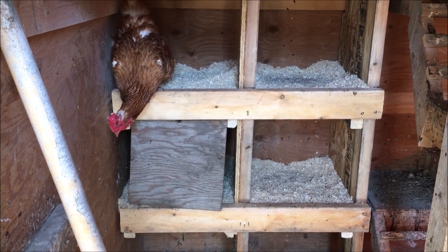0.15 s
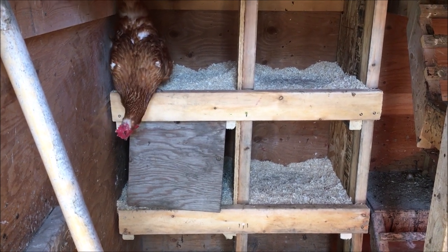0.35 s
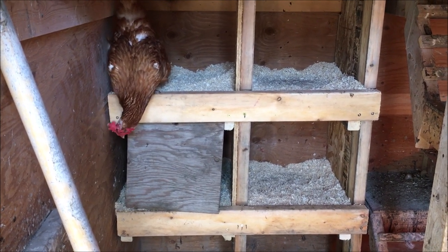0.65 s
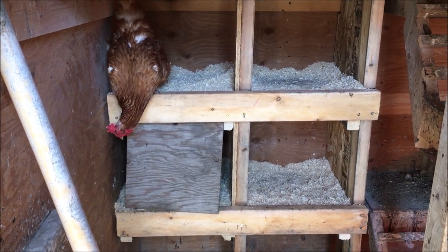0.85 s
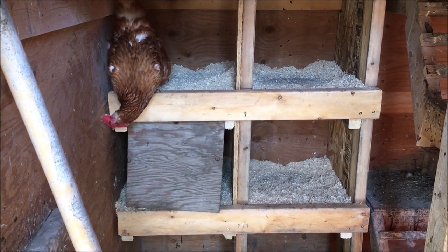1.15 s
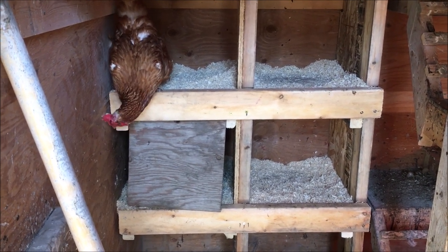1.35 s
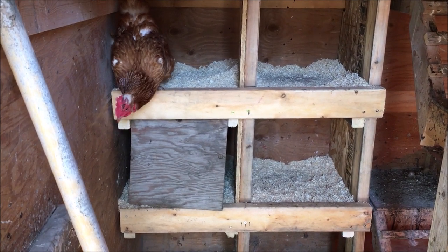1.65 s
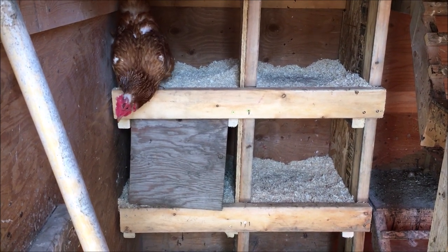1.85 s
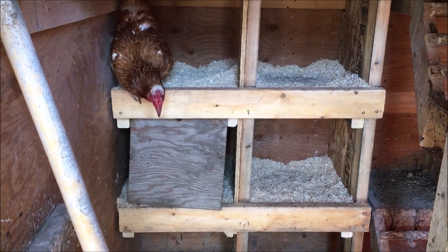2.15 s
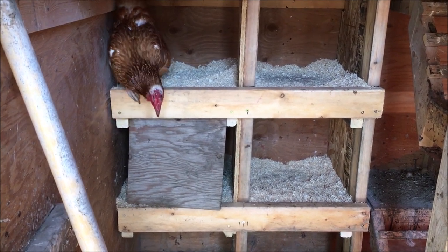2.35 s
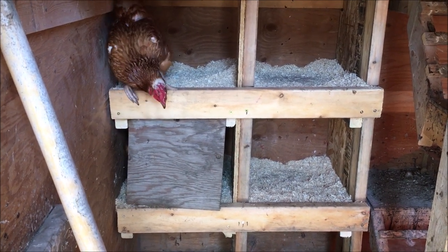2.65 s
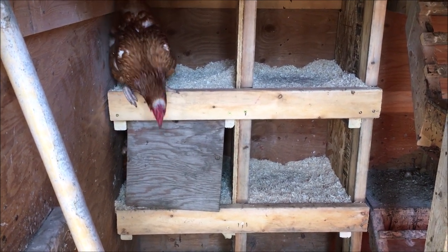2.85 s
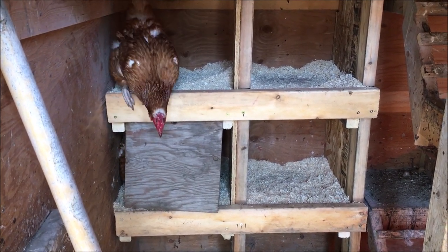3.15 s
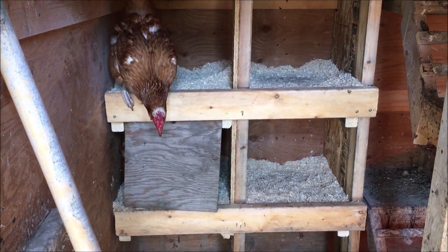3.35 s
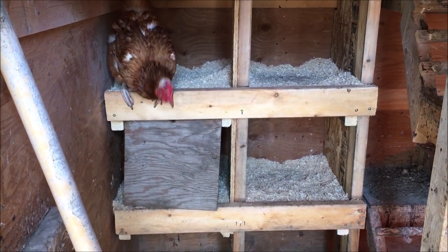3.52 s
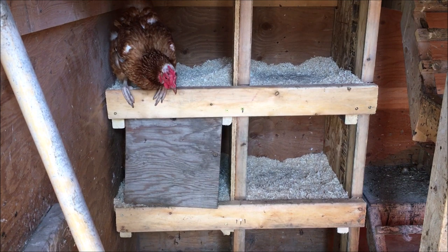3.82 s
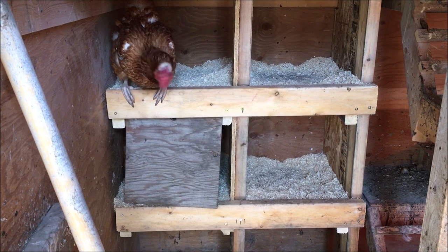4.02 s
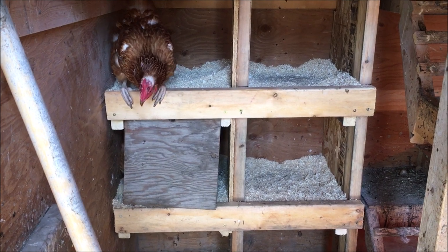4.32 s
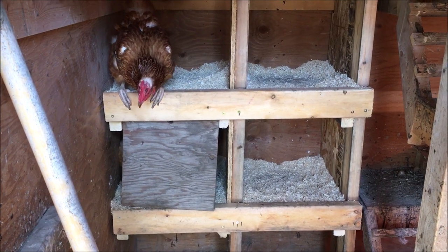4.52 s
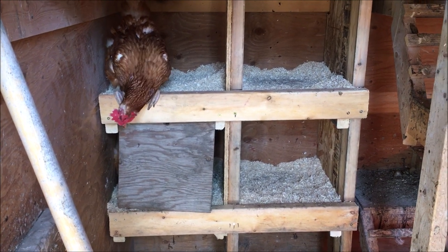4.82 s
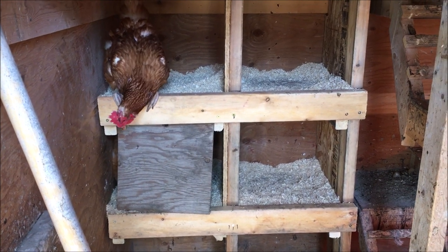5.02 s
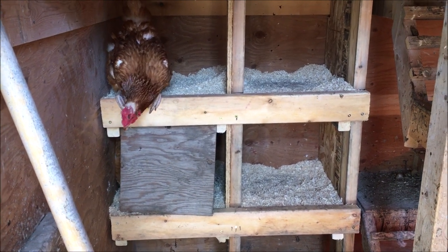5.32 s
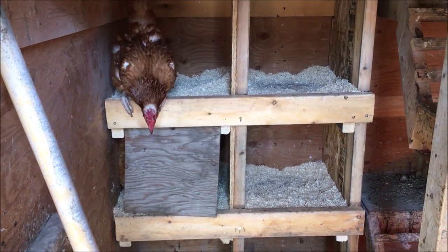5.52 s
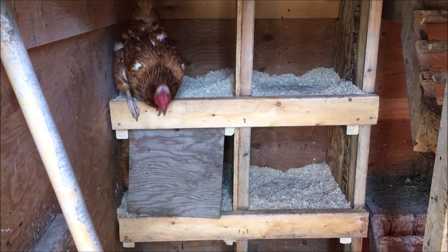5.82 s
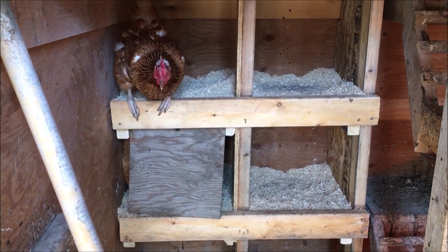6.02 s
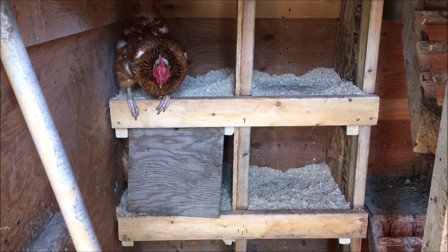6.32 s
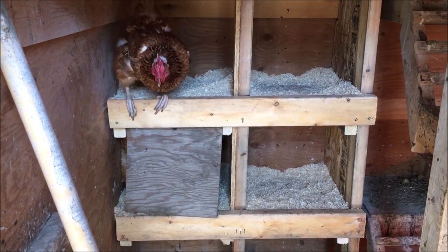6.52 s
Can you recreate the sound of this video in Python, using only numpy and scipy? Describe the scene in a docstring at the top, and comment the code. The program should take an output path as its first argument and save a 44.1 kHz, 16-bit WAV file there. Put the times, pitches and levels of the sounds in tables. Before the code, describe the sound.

Dull wooden bumps and faint scratchy shuffling inside a small plank coop, ending with a close hen's whistling, rasping squawks.

```python
"""Inside a small wooden coop: a quiet yard, and a faint murmur of other hens and lingering coop sound.
Close by, feet and wings scuff and knock on boards and shavings: grainy noise, with booming modes.
Then a hen whistles up into three hoarse squawks, sung by two membranes through a throat and a nest box.
The plank walls ring briefly around bird and contacts; the microphone thins the deepest bass."""
import sys
import numpy as np
from scipy import signal
from scipy.fft import rfft, irfft, next_fast_len
from scipy.io import wavfile
from scipy.ndimage import uniform_filter1d

SR = 44100
rng = np.random.default_rng(int(sys.argv[2]) if len(sys.argv) > 2 else 0)


def pcm_store(signal):
    """Save signal as 16-bit PCM."""
    levels = np.round(np.clip(np.atleast_2d(signal), -1, 1) * 32767)
    wavfile.write(sys.argv[1], SR, levels.astype(np.int16).T)


N = 294147  # samples
T = np.arange(N) / SR  # s

# All levels are relative, ahead of the final mix.
# Air and hiss of the yard: pitch_hz, density_db (per Hz)
YARD_SPECTRUM = [(18, -35.5), (30, -3), (85, 2.5), (102, -10), (467, -13), (1140, -29.5), (1400, -29.5),
                 (1550, -42.5), (1680, -16.5), (2300, -26), (6720, -27.5), (15500, -32.5)]
# Faint murmur of other hens and lingering coop sound, swelling and fading: time_s, level_db
MURMUR_LEVEL = [(0.0, -69.5), (1.2, -69.5), (1.35, -74), (1.78, -55.5), (1.92, -65), (2.34, -62.5),
                (2.55, -72.5), (2.83, -63.5), (3.6, -71), (3.94, -72.5), (4.28, -62.5), (4.8, -67)]
# Spectrum of that murmur: pitch_hz, level_db
MURMUR_SPECTRUM = [(200, 8), (400, -2), (700, 4.5), (1100, -1), (1370, 4.5), (1700, -7), (3000, -9),
                   (6000, -32)]
# Claws and feathers scuffing: start_s, swell_s, fade_s, level_db, then hiss_db, boards_db, frame_db over it
SCUFF_EVENTS = [(0.189, 0.048, 0.028, -50, -13.5, -3, 6), (.26, 0.027, 0.12, -54.5, -16.5, 3.5, -4),
                (0.669, 0.067, 0.23, -48, -7.5, -7, -3), (0.759, 0.041, 0.092, -48, 3.5, 7, -12),
                (0.849, 0.027, 0.049, -43, -26, 6.5, -4), (1.599, 0.049, .25, -52.5, -4, 14.5, 9.5),
                (1.7, 0.078, 0.078, -45, -6.5, 0, -14), (2.048, 0.037, 0.074, -54, -18, -7, -9),
                (2.15, 0.058, 0.081, -67.5, -17, 5.5, 2), (2.65, 0.042, 0.091, -65, 1, 9.5, 0.5),
                (2.733, 0.051, 0.031, -41, -1, -8, 5.5), (2.768, 0.017, 0.053, -58.5, 10, -1, 4),
                (3.2, 0.098, 0.068, -55, 0, 4.5, 8), (3.3, 0.068, 0.2, -69, 1.5, 7.5, 24.5),
                (4.332, .115, 0.072, -49.5, -7.5, -32, 6), (4.63, 0.038, 0.038, -58, -16.5, -13.5, -3.5)]
# Knocks on the wood: start_s, level_db, then click_db, hiss_db, boards_db, frame_db over it, rise_s
KNOCK_EVENTS = [(0.215, -53.5, -13, -4, 12.5, 11.5, 0.005), (0.74, -43, -34, -25, -15, -17, 0.0056),
                (.815, -60, -12, -8, 1, -21, 0.0018), (.853, -32.5, 0, 3.5, 1.5, -21, 0.0044),
                (1.062, -23.5, -13, -14, -9.5, -29, 0.012), (1.208, -39.5, -34, -20, -7, -24, .0014),
                (1.371, -20, -23, -18.5, -9.5, -24, 0.005), (1.623, -35.5, -42, -7.5, 5.5, -28, 0.0025),
                (1.723, -43, -37, 9, 5, 4, 0.00083), (1.768, -27, -31, 4, -12, -4, 0.0062),
                (1.802, -31, -1, -1, -8.5, -13, 0.0013), (2.384, -27, -16.5, -52, -14.5, -15, 0.0029),
                (2.739, -44.5, 6, -1, -19, -15, 0.0033), (2.804, -31, -6, 15, 1.5, -4.5, 0.00041),
                (3.429, -32, -10.5, -15, -4, -11, 0.0043), (3.674, -54.5, -18, -12.5, -10, -15.5, 0.0015),
                (3.909, -57, -34.5, -31, 3.5, -15, .002), (4.436, -37, 4, -7.5, -27, -25, 0.00096),
                (4.668, -42, -1.5, -30, -31, -17, 0.00052), (4.851, -37.5, -18, -20.5, 2, -10, 0.001),
                (5.771, -44, -14, -25, -2.2, 3, 0.0036), (5.867, -32.5, -14.5, -27, -14, -13, 0.00096),
                (6.145, -37, -24, -24, 2.2, -4.5, .002), (6.553, -36, -9.5, -33, -13.5, -26, 0.0026)]
# Spectrum of the wooden contact noise: pitch_hz, level_db
WOOD_SPECTRUM = [(150, -2), (300, 1.5), (620, 2), (850, 4.5), (1260, 2), (1800, -3), (2600, -36.5)]
# Spectrum of the contact hiss: pitch_hz, level_db
HISS_SPECTRUM = [(1200, -8), (2000, -4), (3200, 2), (4500, -3.5), (6500, -9), (9500, -19), (12000, -29),
                 (16000, -38)]
# Spectrum of the contact click and crack: pitch_hz, level_db
CLICK_SPECTRUM = [(1300, -23), (2000, 11.5), (3800, 4), (6000, -39), (16000, -45)]
# Ringing modes of the boards: pitch_hz, level_db, t60_s
BOARD_MODES = [(129.2, -12, 0.47), (211.8, 2.5, 0.25), (279.7, -6, 0.14), (360, -10.5, 0.17),
               (378, -2, 0.19), (617, -5.5, 0.22), (857, -20.5, 0.18), (1258, -16, 0.12)]
# Ringing modes of the coop's deeper frame: pitch_hz, level_db, t60_s
FRAME_MODES = [(50.6, -5.5, 1), (58.8, -2.5, 0.8), (73.9, -1.5, 0.83), (81.65, -5.5, 0.84),
               (99.2, -3.5, 0.37)]
# The hen's calls, one curve a call: time_s, level_db, treble_db
SQUAWK_CURVES = [
    [(4.8, -40, -23), (4.845, -44, -28), (4.925, -37, -51), (4.958, -49.5, -15), (4.98, -36, -35),
     (5.03, -44.5, -10), (5.06, -37.5, -25.5), (5.23, -31.5, -24.5), (5.255, -35.5, -11), (5.29, -32, -14),
     (5.46, -28, -16.5), (5.53, -33, -6.5), (5.62, -29.5, -9.5), (5.68, -26.5, -11), (5.732, -32, -3),
     (5.79, -51, -10)],
    [(5.908, -33, -5), (6.0, -33, -2.5), (6.02, -25, -17), (6.095, -32.5, 0.5), (6.13, -24.5, 1),
     (6.19, -28, -3.5), (6.221, -24.5, -7.5), (6.25, -34.5, 11), (6.272, -17, -8), (6.285, -28.5, 9),
     (6.34, -28.5, 6), (6.39, -30, 3.5), (6.431, -24.5, -20), (6.455, -42, -11)],
    [(6.606, -42, -5.5), (6.641, -30.5, -0.5), (6.67, -31, 8)],
]
# The voice glides in one register, then breaks into the next: start_s, from_hz, to_hz, register (name)
VOICE_BREAKS = [(4.802, 1112, 1076, "cluck"), (4.849, 925.5, 970, "whistle"), (4.961, 956, 1101, "whistle"),
                (5.064, 1082, 1031, "breathy"), (5.149, 1021, 1054, "breathy"),
                (5.225, 1059, 1403, "breathy"), (5.285, 1347, 1340, "hoarse"),
                (5.33, 1160, 1177, "beating"), (5.35, 1405, 1297, "beating"),
                (5.378, 1188, 1191, "beating"), (5.395, 1340, 1340, "hoarse"),
                (5.447, 1497, 1487, "beating"), (5.485, 1339, 1343, "hoarse"), (5.58, 1391, 1328, "rasp"),
                (5.65, 1324, 1362, "rasp"), (5.9, 1322, 1340, "hoarse"), (6.005, 1345, 1334, "reedy"),
                (6.072, 1338, 1361, "clear"), (6.162, 1283, 1375, "breathy"), (6.2, 1365, 1334, "breathy"),
                (6.25, 1274, 1301, "breathy"), (6.283, 1395, 1413, "halved"), (6.328, 1481, 1502, "buzz"),
                (6.397, 1345, 1372, "breathy"), (6.599, 1348, 1340, "rasp"), (6.635, 1340, 1317, "halved")]
# Ways the membrane can swing, by name: half_pitch_db, its_overtones_db, roughness (0-1), second_membrane_db
MEMBRANE_REGISTERS = {"whistle": (-32, -49, 0.24, -49), "clear": (-45, -44, .04, -47),
                      "breathy": (-26, -22, 0.38, -29), "halved": (13.5, -5, 0.14, -7),
                      "hoarse": (2.5, 1, 0.59, -14), "beating": (-20, -7.5, 0.48, -14.5),
                      "rasp": (-16, -0.5, 0.88, -5), "reedy": (-20.5, 2, 0.38, -26),
                      "cluck": (15.5, -16, 0.26, -43), "buzz": (6.5, 5, 0.37, -9.5)}
# Response of throat and beak: pitch_hz, level_db
THROAT_RESPONSE = [(400, -18), (600, -12.5), (1000, 1), (1400, 3), (2000, -7), (2700, -7.5), (3800, -7.5),
                   (4700, -19), (5200, -31.5), (6600, -21.5), (8000, -32.5), (9500, -28), (12000, -49),
                   (16000, -43)]
# Air modes of the nest box around the hen: pitch_hz, level_db, t60_s
NEST_MODES = [(646, -28, 0.051), (780, -3.5, 0.34), (836.4, 5, 0.089), (1030, 5, 0.07), (1185, 0.5, 0.1),
              (1340, -14, 0.061), (1483, -10, 0.42), (1624, 5, 0.15), (1910, -3, 0.29), (2067, 6, 0.033),
              (2340, 5, 0.11), (2655, 9.5, 0.038), (3260, -2, 0.044), (3330, -2.5, 0.044),
              (3730, -10.5, 0.1), (4020, 4, 0.025)]
# Decay of the coop's tail: pitch_hz, t60_s
ROOM_DECAY = [(125, 0.46), (400, 0.23), (1100, 0.21), (2900, 0.18), (7700, 0.1), (14000, 0.16)]

YARD_DB = -67.5
SCUFF_RANGE_DB, SCUFF_CATCH_DB = 26.5, 2.5  # depth of swell and fade; unevenness of the drag
KNOCK_S, KNOCK_PER_RISE = 0.021, 4.44  # t60 of a knock: base, and seconds added per second of rise
CRACK_DB = 14
BREAK_S, SECOND_HZ, THROB_DB = 0.0081, 834.5, 1.3  # register break; centre of second membrane; throb spread
MIC_HZ, TOP_HZ = 48, 15820  # low edge of the microphone, top edge of the recorder


def amp(db):
    """dB to gain."""
    return 10 ** (np.asarray(db) / 20)


def unit(x):
    """Scale to rms 1."""
    return x / np.sqrt(np.mean(x ** 2))


def even(x, seconds):
    """Hold a noise at rms 1 over short stretches."""
    return x / np.sqrt(uniform_filter1d(x ** 2, int(seconds * SR)))


def shape(table, hz):
    """Read a (Hz, value) table on a log-frequency axis."""
    table_hz, values = np.transpose(table)
    return np.interp(np.log(np.maximum(hz, 1)), np.log(table_hz), values)


def colour(x, table):
    """Filter by a (Hz, dB) spectrum."""
    size = next_fast_len(len(x))
    gain = amp(shape(table, np.fft.rfftfreq(size, 1 / SR)))
    return irfft(rfft(x, size) * gain, size)[:len(x)]


def walk(rate):
    """Smooth random wander, about rate changes a second, spread 1."""
    width = max(int(SR / rate), 1)
    once = uniform_filter1d(rng.standard_normal(N), width)
    return unit(uniform_filter1d(once, width))


def ring(x, modes):
    """Let a push or sound excite decaying sine modes (Hz, dB, t60 s)."""
    age = T[:SR]
    body = 0
    for hz, db, t60 in modes:
        body = body + amp(db) * np.sin(2 * np.pi * hz * age) * np.exp(-age * np.log(1000) / t60)
    return signal.fftconvolve(x, body / np.sqrt(np.sum(body ** 2)))[:N]


def yard():
    """Quiet air and hiss as coloured noise; a second noise swells and fades as murmur and lingering sound."""
    time, level_db = np.transpose(MURMUR_LEVEL)
    flicker_db = 1.5 * walk(14)
    murmur_noise = unit(colour(rng.standard_normal(N), MURMUR_SPECTRUM))
    murmur = amp(np.interp(T, time, level_db) + flicker_db) * murmur_noise
    air_gain = amp(YARD_DB + 0.4 * walk(12))
    return air_gain * unit(colour(rng.standard_normal(N), YARD_SPECTRUM)) + murmur


def contact_noises():
    """One grainy noise heard three ways: wood, hiss and click."""
    grains = rng.standard_normal(N) * amp(6.3 * walk(310))
    wood = even(colour(grains, WOOD_SPECTRUM), 0.039)
    hiss = even(colour(grains, HISS_SPECTRUM), 0.028)
    click = even(colour(grains, CLICK_SPECTRUM), 0.019)
    return wood, hiss, click


def scuffs(wood_noise, hiss_noise):
    """Dragging contact: noise that swells and fades unevenly, and random pushes on boards and frame."""
    wood, hiss, tap, push = np.zeros((4, N))
    catch = amp(SCUFF_CATCH_DB * walk(45.05))
    for start, swell, fade, db, hiss_db, board_db, frame_db in SCUFF_EVENTS:
        now = slice(int(start * SR), int((start + swell + fade) * SR))
        rising = (T[now] - start) / swell
        falling = 1 + (start + swell - T[now]) / fade
        ramp = np.minimum(rising, falling)
        drag = amp(db - SCUFF_RANGE_DB * (1 - ramp)) * catch[now]
        for layer, share_db in ((wood, 0), (hiss, hiss_db), (tap, board_db), (push, frame_db)):
            layer[now] += amp(share_db) * drag
    tap *= rng.standard_normal(N)
    push *= rng.standard_normal(N)
    return wood * wood_noise + hiss * hiss_noise, tap, push


def knocks(wood_noise, hiss_noise, click_noise):
    """Blows: short noise that lasts longer after a slow rise, a crack, and pushes on boards and frame."""
    wood, hiss, click, crack, tap, push = np.zeros((6, N))
    for start, db, click_db, hiss_db, board_db, frame_db, rise in KNOCK_EVENTS:
        first = int(start * SR)
        now = slice(first, first + SR // 5)
        age = np.maximum(T[now] - start, 0)
        t60 = KNOCK_S + KNOCK_PER_RISE * rise
        blow = amp(db) * (1 - np.exp(-age / rise)) * np.exp(-age * np.log(1000) / t60)
        for layer, share_db in ((wood, 0), (click, click_db), (hiss, hiss_db)):
            layer[now] += amp(share_db) * blow
        # a slower contact cracks less
        crack[first] = amp(db + click_db + CRACK_DB) * min(0.0015 / rise, 1)
        # one smooth push on the boards; the weight of the bird lands slower on the frame
        tap[now] += amp(db + board_db) * age / 0.00041 * np.exp(-age / 0.00037)
        push[now] += amp(db + frame_db) * age / 0.0027 * np.exp(-age / 0.0013)
    near = wood * wood_noise + hiss * hiss_noise + click * click_noise
    return near + colour(crack, CLICK_SPECTRUM), tap, push


def contacts():
    """Scuffs and knocks close by, and the boom their pushes set off in boards and frame."""
    wood, hiss, click = contact_noises()
    scuff, scuff_tap, scuff_push = scuffs(wood, hiss)
    knock, knock_tap, knock_push = knocks(wood, hiss, click)
    boom = ring(scuff_tap + knock_tap, BOARD_MODES) + ring(scuff_push + knock_push, FRAME_MODES)
    return scuff + knock, boom


def squawk_curves(fade):
    """Breath over time: a gain that fades in and out of each call, and the treble in dB."""
    gate = 0
    for call in SQUAWK_CURVES:
        since_start, until_end = T - call[0][0], call[-1][0] + fade - T
        gate = gate + np.clip(np.minimum(since_start, until_end) / fade, 0, 1)
    time, level_db, treble_db = np.concatenate(SQUAWK_CURVES).T
    return gate * amp(np.interp(T, time, level_db)), np.interp(T, time, treble_db)


def membrane_state():
    """Pitch and register of the swinging membrane, each break smoothed over a few milliseconds."""
    start, from_hz, to_hz = np.transpose([row[:3] for row in VOICE_BREAKS])
    end = np.append(start[1:], N / SR)
    row = np.clip(np.searchsorted(start, T) - 1, 0, None)
    progress = np.clip((T - start[row]) / (end - start)[row], 0, 1)
    glide = from_hz[row] + (to_hz - from_hz)[row] * progress
    registers = np.array([MEMBRANE_REGISTERS[r[3]] for r in VOICE_BREAKS], float)[row].T
    return uniform_filter1d(np.vstack([glide, registers]), max(int(BREAK_S * SR), 1))


def membranes(treble_db, live):
    """A membrane swings at the pitch, drops to every other swing, wobbles; a second beats against it."""
    state = membrane_state()
    hz, rough = state[0], np.clip(state[3], 0, 1)
    wobble = 1 + (0.00411 + rough * 0.02) * walk(40.97) + rough * 0.0658 * walk(316)
    half_phase = (np.pi * np.cumsum(hz * wobble) / SR)[live]
    second_wobble = 1 + 0.025 * walk(29.81) + 0.022 * walk(197.6)
    second_phase = (2 * np.pi * np.cumsum(SECOND_HZ * second_wobble) / SR)[live]
    flutter = walk(170)
    # from here on, only while the hen calls
    hz, half_db, over_db, _, second_db = state[:, live]
    rough_live = rough[live]

    def throat(f):
        """Throat gain; a wider beak lets out the upper partials, in full from 3200 Hz."""
        return amp(shape(THROAT_RESPONSE, f) + np.clip(np.log2(f / 1600), 0, 1) * treble_db[live])

    tone = 0
    for k in range(1, 23):  # multiples of half the pitch
        f = k * hz / 2
        # the shape of the swing keeps changing, so each upper partial flickers and slips alone
        slip = np.roll(flutter, 4001 * k)[live]
        flick = np.roll(flutter, -5003 * k)[live]
        loose = min((k - 1) / 3, 1.5) * np.sqrt(3 * rough_live)
        odd_db = (half_db if k == 1 else over_db) * (k % 2)
        size = throat(f) * amp(odd_db) * amp(2.5 * loose * flick)
        tone = tone + (f < 16000) * size * np.sin(k * half_phase + k * k + 1.1 * loose * slip)
    # tones of the second membrane, and sums and differences of the two
    for m, n in ((0, 1), (0, 2), (2, -2), (-1, 3), (1, 1), (2, 1), (1, 3)):
        f = np.abs(m * hz + n * SECOND_HZ)
        tone = tone + amp(second_db) * throat(f) * np.sin(2 * m * half_phase + n * second_phase)
    return tone / np.sqrt(uniform_filter1d(tone ** 2, size=800)), rough


def breath_noise(treble_db):
    """Unsteady air through the throat, split at 2200 Hz so that the treble opens with the beak."""
    air = rng.standard_normal(N) * amp(2.5 * walk(90))
    low = [(f, db - 40 * (f > 2200)) for f, db in THROAT_RESPONSE]
    high = [(f, db - 40 * (f < 2200)) for f, db in THROAT_RESPONSE]
    return amp(-10.5) * unit(colour(air, low)) + amp(treble_db - 5.5) * unit(colour(air, high))


def hen():
    """Breath drives the membranes and adds rough air; the nest box around the hen rings along."""
    gain, treble_db = squawk_curves(fade=0.0022)
    live = gain > 0
    voice = np.zeros(N)
    voice[live], rough = membranes(treble_db, live)
    voice *= amp(1.16 * walk(87) + rough * 3 * walk(300))
    voice += rough * breath_noise(treble_db)
    call = gain * amp(THROB_DB * walk(36)) * voice
    return call + amp(-14) * ring(call, NEST_MODES)


def room(x, wet_db):
    """Direct sound and the plank walls' dense noise tail, its decay time set by frequency."""
    hz, age, bins = signal.stft(rng.standard_normal(SR // 2), SR, nperseg=256)
    decay = amp(-60 * age / shape(ROOM_DECAY, hz)[:, None])
    tail = signal.istft(bins * decay, SR)[1]
    tail *= np.clip(np.arange(len(tail)) / SR / 0.0064, 0, 1)  # 6.4 ms build-up
    return x + amp(wet_db) * signal.fftconvolve(x, tail / np.sqrt(np.sum(tail ** 2)))[:N]


def scene():
    """Contacts and hen in the coop, over the yard."""
    near, boom = contacts()
    coop = room(amp(-2.5) * hen(), wet_db=-3.5) + room(amp(-1.5) * near, wet_db=0.5)
    return (coop + boom + yard())[None]


def record(dry):
    """The microphone drops the deepest bass and the recorder cuts the top."""
    mic = signal.butter(5, MIC_HZ, "high", fs=SR, output="sos")
    recorder = signal.ellip(10, 0.2, 60, TOP_HZ, fs=SR, output="sos")
    return signal.sosfilt(recorder, signal.sosfilt(mic, dry))


dry = scene()
out = record(dry)
pcm_store(out)
```